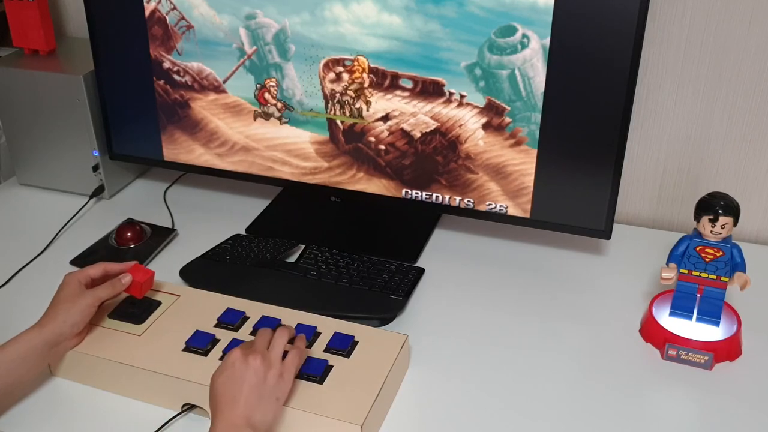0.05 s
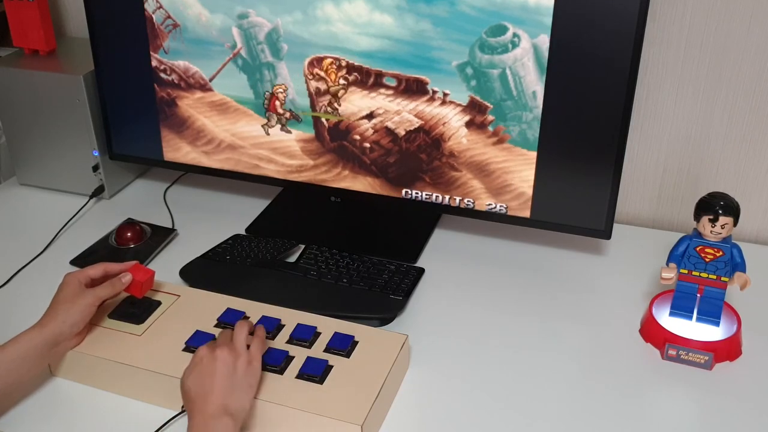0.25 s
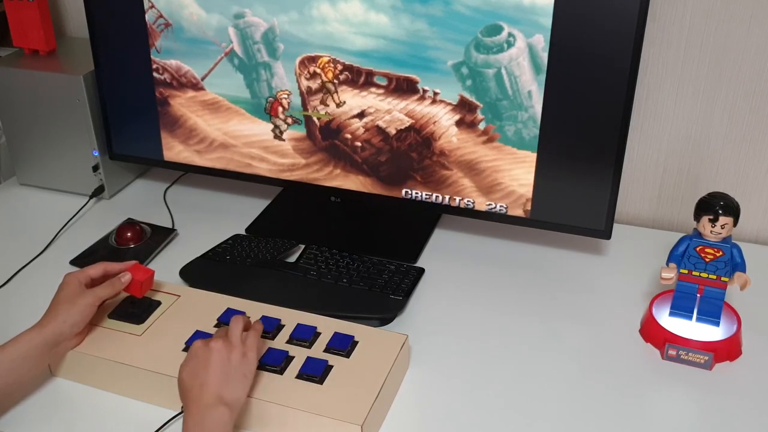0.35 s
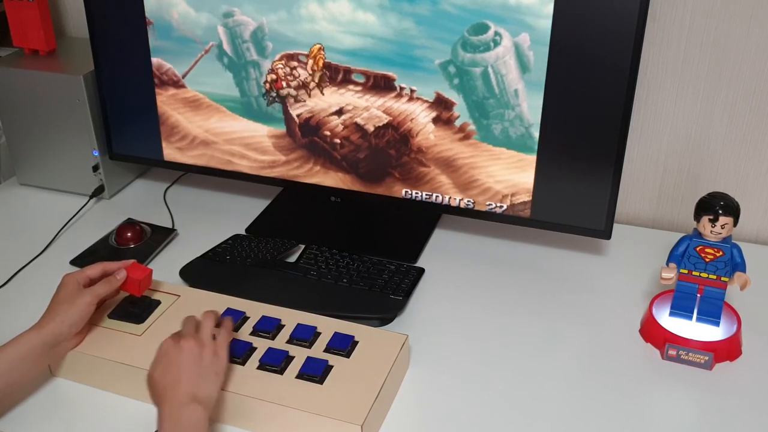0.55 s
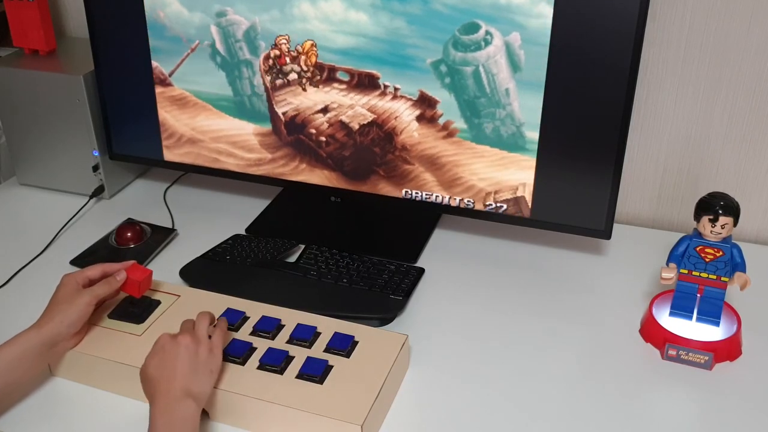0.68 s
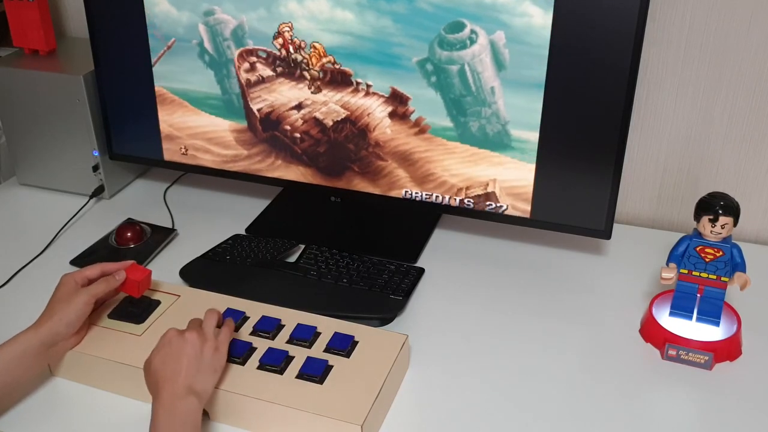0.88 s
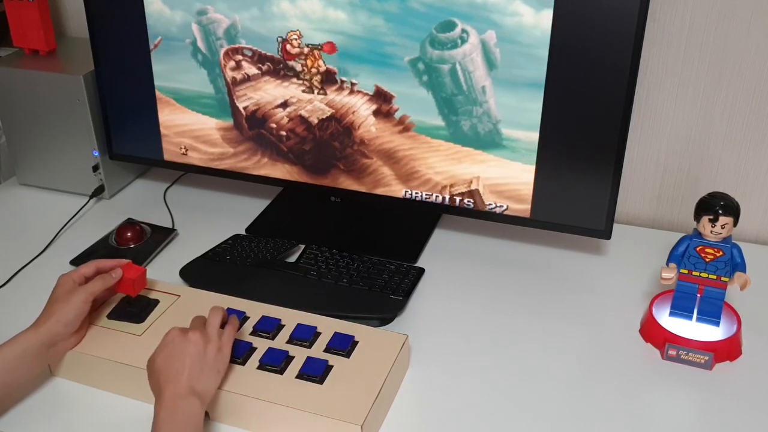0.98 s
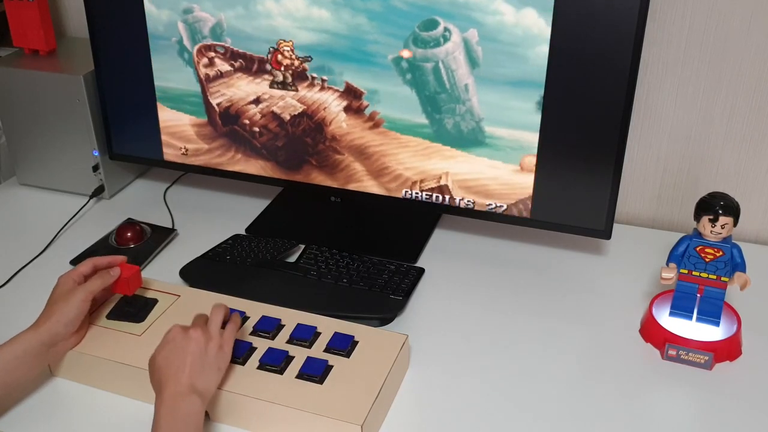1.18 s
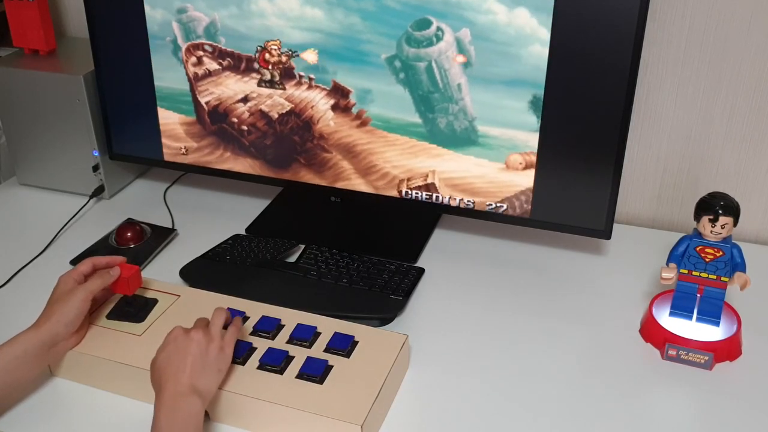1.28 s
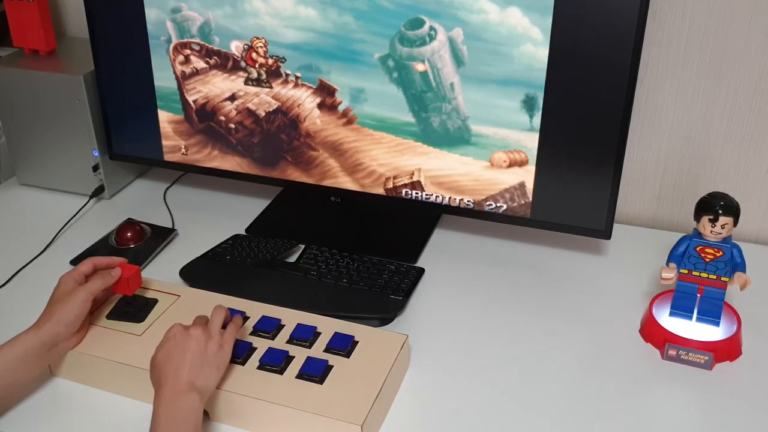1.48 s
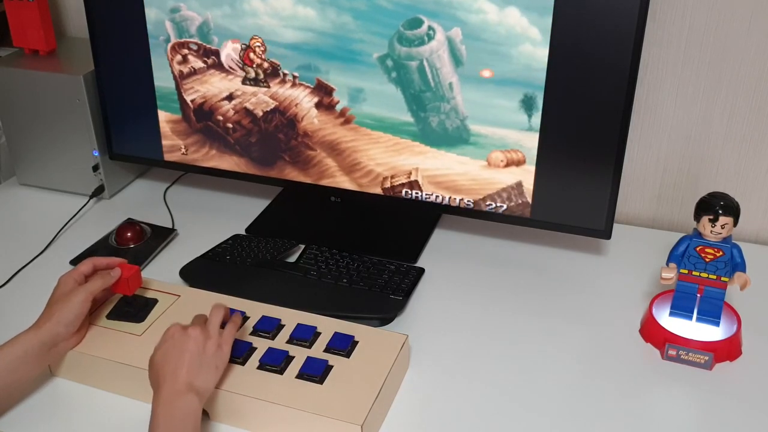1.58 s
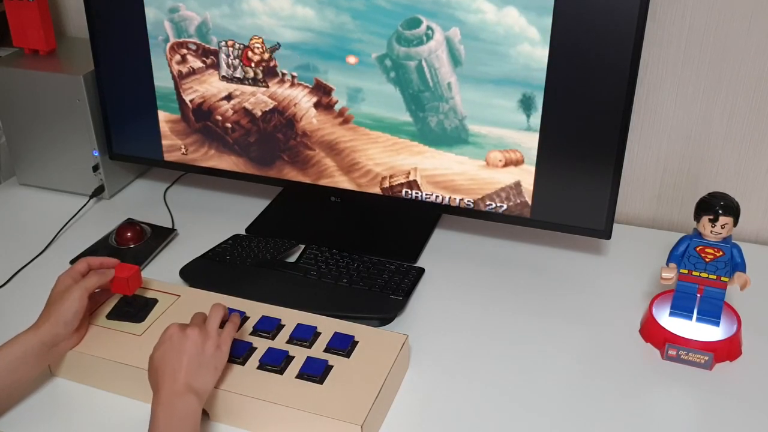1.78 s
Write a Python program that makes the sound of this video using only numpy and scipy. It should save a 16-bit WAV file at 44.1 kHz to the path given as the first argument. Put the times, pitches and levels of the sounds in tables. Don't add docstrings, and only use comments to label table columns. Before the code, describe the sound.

Rapid uneven button taps and stick knocks on a hollow cardboard box in a small room

```python
import sys
import numpy as np
from scipy import signal
from scipy.fft import rfft, irfft, next_fast_len
from scipy.io import wavfile
from scipy.ndimage import uniform_filter1d

SR = 44100
rng = np.random.default_rng(int(sys.argv[2]) if len(sys.argv) > 2 else 0)


def volts_from_decibels(level):
    exponent = np.asarray(level, float) / 20
    return 10 ** exponent


def persist_wave(psi):
    counts = np.round(np.clip(psi, -1, 1) * 32767).astype(np.int16)
    wavfile.write(sys.argv[1], SR, np.atleast_2d(counts).T)


N = 81585
PAD = 8192
LEN = next_fast_len(N + 3 * PAD)
HZ = np.maximum(np.fft.rfftfreq(LEN, 1 / SR), 1)
MIC_TOP_HZ = 15700

# pitch in Hz, level in dB, time to fall 60 dB in seconds.
BOX_MODES = [(396, -11, 0.04), (495, -7, 0.1), (606, 4.5, 0.058), (673, -3, 0.034), (744.6, -5, 0.072),
             (810.6, -3, 0.054), (874.8, -10, 0.062), (930.4, 0, 0.027), (1048.7, -10.5, 0.054),
             (1218, -2.5, 0.0063), (1390, -7.5, 0.01), (1716, -26, 0.048), (2050, -9, 0.0045),
             (2760, -9, 0.0059)]


def curve(rows, hz):
    rows = np.array(rows, float)
    return np.interp(np.log(hz), np.log(rows[:, 0]), rows[:, 1])


def unit(x):
    return x / np.sqrt(np.mean(x ** 2))


def bump(modes, centre_hz, width_oct):
    octaves = np.log2(np.array(modes)[:, 0] / centre_hz)
    return np.exp(-.5 * (octaves / width_oct) ** 2)


def add(out, start_s, x):
    i = PAD + int(start_s * SR)
    out[i:i + len(x)] += x[:len(out) - i]


def ring(modes, gains_db, detune, size=PAD):
    t, m = np.arange(size) / SR, np.array(modes, float)
    pitch_hz = m[:, :1] * detune[:, None]
    decay = np.exp(-np.log(1000) * t / np.maximum(m[:, 2:], .005))
    return volts_from_decibels(m[:, 1] + gains_db) @ (np.sin(2 * np.pi * pitch_hz * t) * decay)


def skin(x, tilt_db):
    hz = np.maximum(np.fft.rfftfreq(len(x), 1 / SR), 1)
    slope = volts_from_decibels(tilt_db * np.maximum(np.log2(hz / 966), 0))
    softness = 1 / (1 + (hz / 3170) ** 6)
    small_box = 1 / (1 + 273 / (1j * hz)) ** 2
    return irfft(rfft(x) * slope * softness * small_box, len(x))


def rattle(length_s):
    rise_share, scatter_db, blow_db, sharp_s = 0.12, 6.5, -7.5, 0.0056
    t = np.arange(PAD // 2) / SR
    dur = max(length_s, .0005)
    grit = rng.standard_normal((2, len(t)))
    contacts = grit[0] * volts_from_decibels(scatter_db * grit[1])
    contacts = contacts * (1 - np.exp(-t / (rise_share * dur))) * np.exp(-t / dur)
    blow = volts_from_decibels(blow_db) * min(sharp_s / length_s, 1) * (t == 0)
    spectrum = rfft(contacts / np.sqrt(np.sum(contacts ** 2)) + blow)
    spectrum = spectrum / np.sqrt(uniform_filter1d(np.abs(spectrum) ** 2, size=13))
    return irfft(spectrum) * (t < .07)


def taps():
    spot_lift_db, spot_width_oct, mode_scatter_db, taps_db = 9.5, 0.23, 5, -4.5
    # start in seconds, level in
    # dB, brightness in dB per octave, rattle length in ms, pitch the struck spot favours in Hz.
    finger_taps = [(0.191, -31.5, 5, 4.2, 597), (0.197, -22.5, 3.5, 10.6, 1060),
                   (0.233, -20, 6.5, 5.3, 1170), (0.243, -18, -1, 5.5, 440), (0.404, -37.5, -25, 7, 610),
                   (0.415, -29, -3, 14, 620), (0.436, -18.5, -2, 10, 830), (0.453, -21.5, -3.5, 6.9, 940),
                   (0.57, -25, -1, 7, 1210), (0.582, -22.5, 2, 6.6, 754), (0.718, -35.5, -20, 25, 590),
                   (0.759, -25, -2, 5, 860), (0.7757, -10, 3, 7.8, 744), (0.799, -19, -2, 5.4, 850),
                   (0.839, -23.5, 2, 2.9, 875), (0.936, -25, -1.5, 4.7, 614), (1.0, -21.5, 5, 2.7, 1960),
                   (1.1, -14.5, -8.5, 4.4, 920), (1.119, -20.5, -20, 7.4, 660), (1.166, -34, -20, 2.7, 820),
                   (1.183, -20.5, -9, 2.8, 970), (1.305, -30, -6, 9, 974), (1.323, -27.5, -34, 12.6, 567),
                   (1.373, -21.5, -18, 5.9, 960), (1.399, -31, 8.5, 4.6, 610), (1.444, -32, 6, 7.7, 620),
                   (1.51, -21.5, -1.5, 3.3, 736), (1.549, -23, -5.5, 2.74, 755),
                   (1.619, -32.5, 4, 8.7, 1450), (1.746, -30, -3, 7.4, 587),
                   (0.214, -36, -11, 6.9, 920),
        (0.364, -38, 1, 2, 800),
        (0.38, -36.5, -19, 2.6, 514),
        (0.788, -16, 1, 2.7, 620),
        (0.808, -21.5, -5, 12, 890),
        (0.917, -35, -16, 5.9, 495),
        (1.141, -48, -17, 2.3, 920),
        (1.197, -28, -18, 2.1, 587),
        (1.383, -26.5, -10, 24.3, 586),
    ]
    earlier_tap = (-0.0034, -42.5, -6, 30, 500)
    out = np.zeros((2, LEN))
    lead = PAD // 32
    for k, (start_s, level_db, tilt_db, ms, spot_hz) in enumerate([earlier_tap] + finger_taps):
        chance = rng.standard_normal((2, len(BOX_MODES)))
        gains_db = spot_lift_db * bump(BOX_MODES, spot_hz, spot_width_oct) + mode_scatter_db * chance[0]
        body = ring(BOX_MODES, gains_db, 1 + 0.028 * chance[1])
        struck = signal.fftconvolve(body, rattle(ms / 1000))
        tap = skin(np.r_[np.zeros(lead + 1), struck], tilt_db)
        add(out[k % 2], start_s - lead / SR, tap / np.abs(tap).max() * volts_from_decibels(level_db + taps_db))
    return out


def rustles():
    width_oct, low_share = 0.51, 0.73
    skirt_db, skirt_per_db, skirt_low_hz = 4.5, 0.73, 3500
    foil_hz, foil_width_hz, foil_db, hard_db = 4240, 100, 4, -18.5
    rustles_db = -8.5
    # start in seconds, level in dB, centre in Hz, length in ms.
    contact_rustles = [(0.191, -31.5, 7500, 17), (0.1966, -16, 9100, 3.5), (0.2113, -16.5, 7950, 3.7),
                       (0.238, -21.5, 10400, 3.9), (0.2397, -22.5, 4160, 4), (0.2495, -41, 6000, 3),
                       (0.421, -41.5, 7160, 18), (0.433, -35.5, 9800, 14), (0.5675, -34, 6400, 10.8),
                       (0.76, -23.5, 9050, 3.2), (0.7735, -20.5, 8600, 5.3), (0.8614, -42.5, 8000, 25),
                       (0.9324, -48, 6900, 69), (0.9768, -33.5, 9800, 10), (1.065, -41.5, 8600, 16),
                       (1.1068, -39, 7960, 9.1), (1.1772, -38.5, 9000, 13), (1.265, -48.5, 8600, 58),
                       (1.3687, -33, 9900, 11), (1.4038, -43.5, 10000, 17), (1.4584, -39, 8450, 15.4),
                       (1.5103, -48, 7800, 14), (1.5664, -36, 7200, 6.3), (1.6164, -28, 7060, 5),
                       (1.6683, -41, 7900, 10.6), (1.719, -48.5, 9600, 18)]
    out, t = np.zeros((2, LEN)), np.arange(PAD) / SR
    hz = np.maximum(np.fft.rfftfreq(PAD, 1 / SR), 1)
    for k, (start_s, level_db, centre_hz, ms) in enumerate(contact_rustles):
        hardness_db = level_db - hard_db
        side_oct = width_oct * np.where(hz < centre_hz, low_share, 1)
        colour = np.exp(-.5 * (np.log2(hz / centre_hz) / side_oct) ** 2)
        skirt = volts_from_decibels(skirt_db + skirt_per_db * hardness_db) / (1 + (skirt_low_hz / hz) ** 2)
        foil = volts_from_decibels(foil_db + min(hardness_db, 6)) / (1 + ((hz - foil_hz) / foil_width_hz) ** 2)
        swell = np.minimum(t / 0.0025, 1) * np.exp(-1000 * t / max(ms, 1))
        grit = rng.standard_normal((2, PAD))
        clicks = rfft(grit[0] * volts_from_decibels(4.5 * grit[1]) * swell)
        clicks = clicks / np.sqrt(uniform_filter1d(np.abs(clicks) ** 2, size=61))
        spray = unit(irfft(clicks * (colour + skirt + foil), PAD) * (t < .17))
        add(out[k % 2], start_s, volts_from_decibels(level_db + rustles_db) * spray * np.sqrt(np.mean(swell ** 2)))
    return out


def thumps():
    push_s, desk_swell_s, thumps_db = 0.0023, 0.0046, -8
    panel_lift_db, panel_width_oct = 8.5, 0.26
    # start in seconds, level in dB, panel share in dB, pitch of the panel that gives most in Hz.
    desk_thumps = [(0.203, -28.5, -5, 198), (0.24, -20, -4, 217), (0.255, -13, -6, 140),
                   (0.301, -39.5, 5.5, 142), (0.39, -36.5, -26, 200), (0.447, -32, 5, 121),
                   (0.61, -35.5, -6.5, 288), (0.701, -35, -18, 405), (0.795, -22, -0.5, 185),
                   (0.867, -36, 2, 145), (1.002, -21.5, -9.5, 210), (1.111, -36.5, 4, 120),
                   (1.24, -42, -10, 196), (1.322, -40.5, 4.5, 240), (1.408, -31.5, -1, 124),
                   (1.478, -30.5, -6, 121), (1.612, -25, -8.5, 197), (1.66, -31, -9, 122),
                   (1.76, -43.5, 0, 119)]
    # pitch in Hz, level in dB, time to fall 60 dB in seconds.
    desk_modes = [(54.7, 0.5, 0.16)]
    panel_modes = [(121, -18, 0.33), (143.2, -8, 0.24), (210, -4.5, 0.2), (279.4, -7, 0.17),
                   (387.4, 0, 0.13)]
    out, t = np.zeros(LEN), np.arange(2 * PAD) / SR
    push = np.hanning(max(int(push_s * SR), 3))
    for start_s, level_db, share_db, panel_hz in desk_thumps:
        chance = rng.standard_normal((2, 6))
        lift_db = panel_lift_db * bump(panel_modes, panel_hz, panel_width_oct)
        gains_db = share_db + lift_db + 1.9 * chance[0, 1:]
        panels = ring(panel_modes, gains_db, 1 + 0.028 * chance[1, 1:], size=2 * PAD)
        desk = ring(desk_modes, np.zeros(1), 1 + 0.047 * chance[1, :1], size=2 * PAD)
        desk = desk * (1 - np.exp(-t / desk_swell_s))
        add(out, start_s, volts_from_decibels(level_db + thumps_db) * np.convolve(panels + desk, push / push.sum()))
    return out


def handling():
    # time in seconds, level in dB.
    leaning = np.array([(0.0, -85), (0.144, -94), (0.252, -59), (0.37, -58), (0.422, -37), (0.532, -64),
                        (0.726, -44.5), (0.978, -32), (1.338, -46.5), (1.484, -41), (1.728, -45),
                        (1.85, -88)])
    t = (np.arange(LEN) - PAD) / SR
    grit = rng.standard_normal((2, LEN))
    grains = grit[0] * volts_from_decibels(0.5 * grit[1])
    body = ring(BOX_MODES, np.zeros(len(BOX_MODES)), np.ones(len(BOX_MODES)))
    murmur = unit(skin(signal.fftconvolve(grains, body)[:LEN], -0.5))
    return murmur * volts_from_decibels(np.interp(t, leaning[:, 0], leaning[:, 1]) - 10.5)


def stereo_noise():
    mid, side = rng.standard_normal((2, LEN))
    likeness_hz = 610
    side_weight = np.sqrt(1 / (1 + (likeness_hz / HZ) ** 2)) * np.array([[1], [-1]])
    return mid, side, side_weight


def room():
    # frequency in Hz, time to fall 60 dB in seconds.
    decay_times = [(60, 1.5), (250, 0.5), (700, 0.23), (2000, 0.2364), (5000, 0.29), (10000, 0.44)]
    # frequency in Hz, level in dB.
    tail_levels = [(130, -15.5), (250, -2.5), (700, -3), (2000, -2), (5000, 3.5), (10000, 1.5)]
    # frequency in Hz, left minus right in dB.
    left_right = [(60, -5.5), (110, -4.5), (200, -1.5), (380, 1.0), (700, 0), (1290, -0.5), (2380, -0.5),
                  (4400, 1.5), (8120, -1), (15000, -2.5)]
    left_lag_s = -.0001
    mid, side, side_weight = stereo_noise()
    t, tail = np.arange(LEN) / SR, 0
    onset = np.clip((t - .003) / 0.0016, 0, 1) * (t < .9)
    for hz in 40 * 2 ** np.arange(0, 9, .5):
        env = onset * np.exp(-np.log(1000) * t / curve(decay_times, hz))
        env = env * volts_from_decibels(curve(tail_levels, hz)) / np.sqrt(np.sum(env ** 2))
        octaves = np.log2(np.clip(HZ, 40, 14400) / hz)
        band = np.cos(np.pi * np.clip(octaves, -.5, .5)) ** 2
        tail = tail + band * (rfft(env * mid) + side_weight * rfft(env * side))
    direct = np.exp(-1j * np.pi * HZ * left_lag_s * np.array([[1], [-1]]))
    return (direct + tail) * volts_from_decibels(curve(left_right, HZ) * np.array([[.5], [-.5]]))


def background():
    # frequency in Hz, density in dB per Hz.
    hum_and_hiss = [(18, -68), (30, -14), (130, -2.5), (173, -5), (467, -8.5), (1200, -32.5), (2990, -32.5),
                    (7860, -38.5), (15500, -32.5)]
    mid, side, side_weight = stereo_noise()
    spectrum = (rfft(mid) + side_weight * rfft(side)) * volts_from_decibels(curve(hum_and_hiss, HZ))
    noise = irfft(spectrum * (HZ < MIC_TOP_HZ), LEN)
    return noise / np.sqrt(np.mean(noise.mean(axis=0) ** 2)) * volts_from_decibels(-55.5)


def scene():
    # frequency in Hz, gain in dB.
    mic_response = [(20, -12), (40, -4.5), (60, 5.5), (3600, 4), (11000, -0.5), (13500, -5), (15500, -8)]
    mic = volts_from_decibels(curve(mic_response, HZ)) * (HZ < MIC_TOP_HZ)
    ends = taps() + rustles()
    near, far = ends[0] + thumps(), ends[1] + handling()
    heard = irfft((rfft(near) * room() + rfft(far) * room()) * mic, LEN)
    return (heard + background())[:, PAD:PAD + N]


def roll_off(x):
    return signal.sosfilt(signal.butter(12, 15700, fs=SR, output="sos"), x)


def record(dry):
    return roll_off(dry)


dry = scene()
out = record(dry)
persist_wave(out)
```